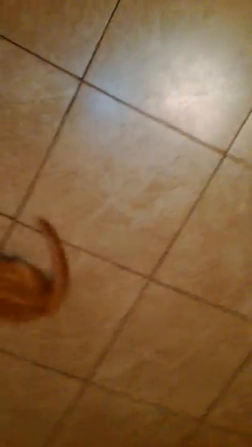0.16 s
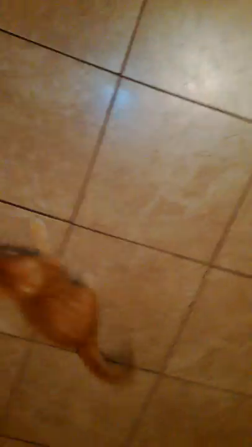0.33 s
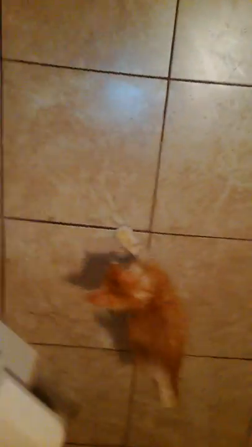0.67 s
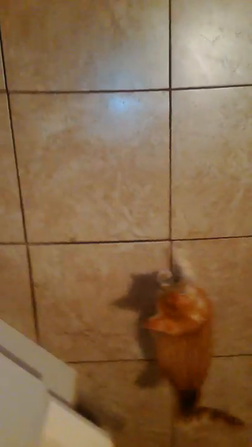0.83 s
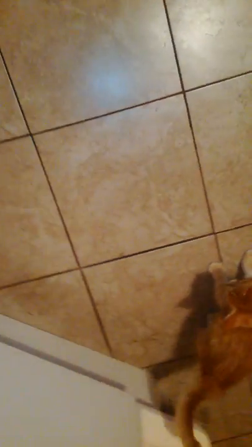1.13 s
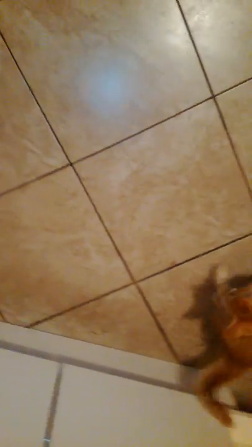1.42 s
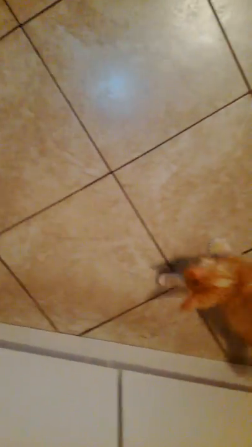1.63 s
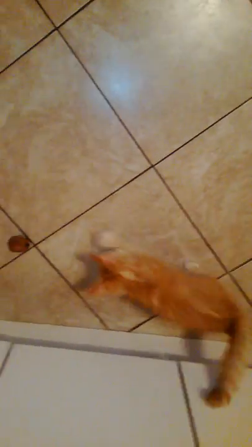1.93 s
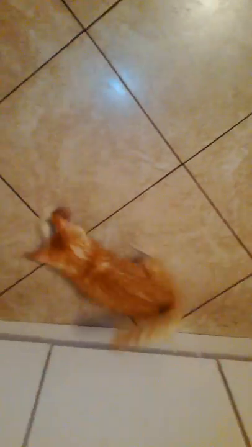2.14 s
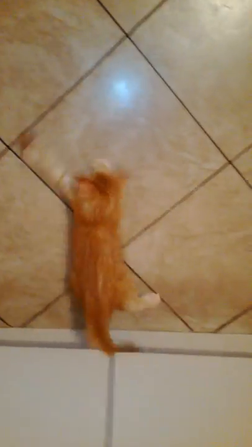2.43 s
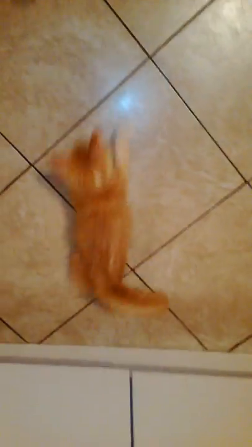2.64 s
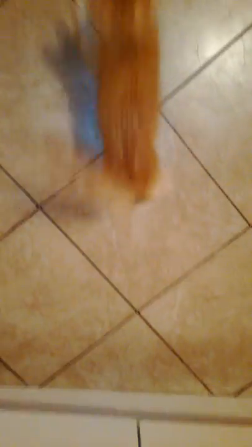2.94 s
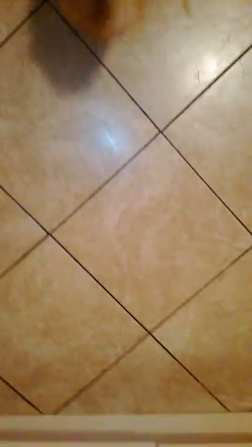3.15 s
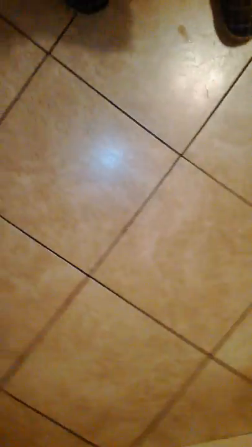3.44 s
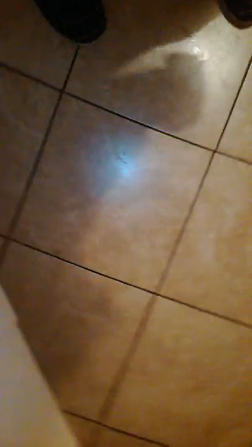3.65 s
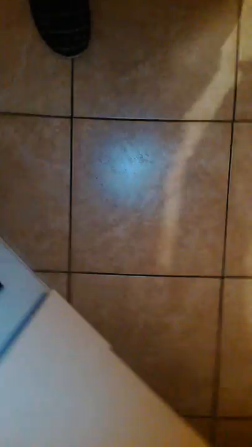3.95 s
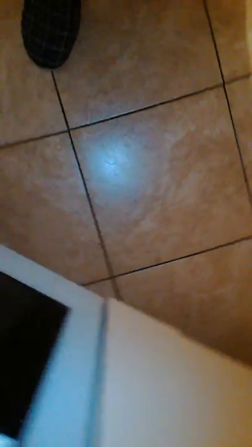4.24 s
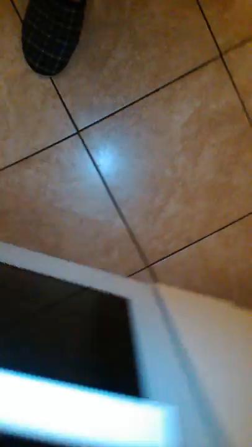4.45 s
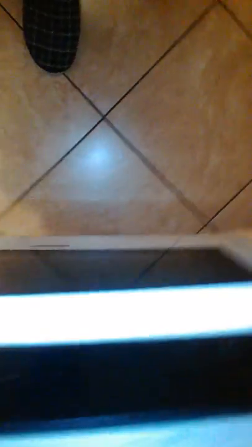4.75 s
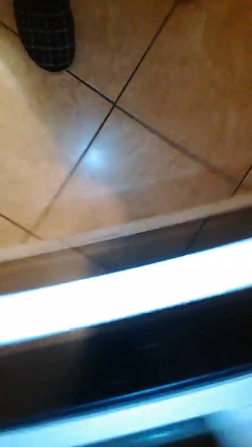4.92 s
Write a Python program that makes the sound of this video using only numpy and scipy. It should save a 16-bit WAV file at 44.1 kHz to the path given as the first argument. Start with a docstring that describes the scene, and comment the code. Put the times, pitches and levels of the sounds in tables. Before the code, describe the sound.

Batted by a kitten, a whole walnut clatters and skids over hard tiles in a small room, occasionally bumping wooden panels.

```python
"""Walnut on a tiled floor

A kitten bats a whole walnut across a small, bare room. Contacts excite the modes of the ridged shell,
which rattles as it rolls, clacks and skids on the tiles, and knocks on a skirting board and a cupboard.
Feet thud softly and brush the glaze. Hard walls reflect every contact, and the microphone is bright."""
import sys
import numpy as np
from scipy import signal
from scipy.fft import rfft, irfft
from scipy.io import wavfile

SR = 44100
rng = np.random.default_rng(int(sys.argv[2]) if len(sys.argv) > 2 else 0)


def to_wav(sig):
    """Store sig (one row per channel, or 1-D mono) as 16-bit WAV at the path in sys.argv[1].

    Samples outside -1..1 are clipped; the rate is SR.
    """
    pcm = np.clip(np.atleast_2d(sig), -1, 1) * 32767
    pcm = np.round(pcm).astype(np.int16)
    wavfile.write(sys.argv[1], SR, pcm.T)  # frames by channels


N = 224017
TIME = np.arange(N) / SR

# Levels in the tables are relative. The nut's range from the microphone: (time [s], distance [m])
NUT_PATH = [(0, 1.34), (0.92, 0.72), (1.4, 1.4), (2.3, 2.25), (2.6, 0.48), (2.8, 0.52), (3.25, 0.72),
            (3.55, 2.7), (3.95, 1.2), (4.15, 1), (5.0, 0.69)]
# Each bat or rebound rolls the nut on another side of its shell, until the next:
# (time [s], time it would take to stop [s], shell level [dB], treble level [dB], tile level [dB],
#  favoured pitch [Hz], fall-off from that pitch [dB/octave], narrow singing at that pitch [dB])
ROLLS = [(0.0, 1.2, -46.5, -49.5, -53, 1910, 15, -11), (0.14, 1.6, -42.5, -55, -55, 1730, 28, 2),
         (0.39, 0.43, -43.5, -54.5, -61.5, 1790, 29, 10), (0.68, 0.5, -50.5, -57, -61, 1420, 19, -9),
         (1.06, 0.3, -56, -62, -65, 1440, 16, -12), (1.361, 1.8, -72, -67, -73, 1500, 10, -16),
         (2.263, 0.9, -41.5, -52, -55, 1420, 24, 0), (2.465, 0.8, -39, -45.5, -54, 1670, 18, 7),
         (2.95, 9.3, -49, -57, -62.5, 1865, 46, -5), (3.289, 0.36, -44, -54.5, -61, 1880, 17, 1),
         (3.6, 2.1, -49, -58.5, -57, 1850, 12, -12), (3.705, 1.5, -40.5, -53.5, -50, 1650, 22, -6),
         (3.976, 1.5, -39.5, -51.5, -40.5, 1850, 39, 6), (4.2, 0.9, -44, -56, -42.5, 1890, 24, 2),
         (4.555, 0.53, -46, -59.5, -45.5, 1806, 4, -8)]
# Feet brushing the glaze: (time [s], duration [s], centre of the hiss [Hz], level [dB])
FOOT_SCUFFS = [(0.019, 0.045, 11800, -42), (2.35, 0.16, 11000, -53), (2.46, 0.071, 9300, -38.5),
               (2.855, 0.39, 11800, -52.5), (3.692, 0.068, 11300, -45), (3.8, 0.086, 11600, -62),
               (3.915, 0.039, 8130, -32), (4.028, 0.14, 11600, -50)]
# The nut sliding: (time [s], shell level [dB], rise time [s], decay time [s], treble level [dB])
NUT_SKIDS = [(0.03, -35.5, 0.039, 0.14, -40.5), (0.425, -48, 0.015, 0.05, -50),
             (0.682, -46, 0.0017, 0.026, -41), (0.8, -38, 0.0046, 0.046, -54.5),
             (0.914, -39.5, 0.0017, 0.052, -57), (2.214, -34.5, 0.024, 0.026, -38.5),
             (2.457, -49, 0.008, 0.18, -36), (2.542, -27, 0.0088, 0.0062, -25.5),
             (3.703, -31.5, 0.032, 0.016, -34), (3.823, -34, 0.0016, 0.053, -38),
             (4.556, -33, 0.0017, 0.006, -40), (4.718, -42, 0.01, 0.0057, -44),
             (4.795, -37.5, 0.0089, 0.035, -52), (4.949, -39, 0.002, 0.051, -51.5)]
# Impacts on the tiles: (time [s], shell level [dB], treble level [dB], favoured pitch [Hz], ping [Hz])
TILE_CLACKS = [(0.139, -11.5, -22.5, 1550, 6760), (0.237, -17, -27.5, 1610, 5830),
               (0.4243, -25.5, -42, 1784, 6200), (0.4952, -29, -62, 1780, 6400),
               (0.6832, -31, -33, 1580, 6300), (0.789, -30, -41, 1510, 6350),
               (0.801, -26, -33.5, 1270, 6400), (0.9144, -28, -42, 1800, 6150),
               (0.954, -41, -42, 1680, 6350), (0.983, -39, -44, 1500, 6400),
               (1.361, -47.5, -56, 1680, 6300), (1.377, -56, -54, 1850, 6600),
               (1.394, -45, -56, 1390, 6500), (1.412, -54, -58, 1950, 6600),
               (2.2165, -36, -47.5, 1910, 6560), (2.2316, -31.5, -41, 1680, 6400),
               (2.2653, -21, -30.5, 1430, 6100), (2.357, -26.5, -32, 1530, 6540),
               (2.465, -30, -27, 1590, 6140), (2.477, -34, -49, 1630, 6950), (2.514, -37, -33, 1670, 7500),
               (2.5505, -15.5, -30, 1630, 5700), (2.5664, -14.5, -24.5, 1595, 6400),
               (2.583, -26, -38, 1660, 6600), (2.605, -16, -18.5, 1660, 7000),
               (2.621, -40, -26, 1630, 4700), (2.665, -21, -20.5, 1600, 7200),
               (2.678, -27, -25, 1700, 7340), (2.7148, -17.5, -20, 1700, 6540),
               (2.771, -24, -29.5, 1470, 4400), (2.7949, -15.5, -20, 1690, 6820),
               (2.811, -19, -28.5, 1690, 3680), (2.821, -23, -29, 1630, 4060),
               (2.845, -25.5, -38, 1620, 3760), (2.873, -23.5, -41, 1560, 4320),
               (3.0757, -32, -47, 1880, 6100), (3.0946, -28, -37, 2140, 6200),
               (3.138, -37, -38, 1870, 7100), (3.1602, -25, -35.5, 1780, 3700),
               (3.1844, -29, -36, 2000, 3620), (3.2621, -25, -29.5, 1840, 3760),
               (3.2926, -31, -32, 1730, 5760), (3.3396, -25.5, -34.5, 2020, 5940),
               (3.6337, -30, -44, 1800, 6460), (3.702, -20.5, -45, 1400, 6540),
               (3.8243, -22.5, -25, 1880, 5940), (4.1065, -26, -38, 1720, 6600),
               (4.154, -16, -18.5, 1440, 6100), (4.304, -29, -50, 1800, 6500),
               (4.3749, -24.5, -39, 1770, 6100), (4.4289, -24, -46, 1830, 6500),
               (4.5544, -15, -23.5, 1605, 4980), (4.56, -42, -31.5, 2040, 6300),
               (4.593, -43, -46, 1490, 6200), (4.6795, -32.5, -53, 1900, 6500),
               (4.807, -32, -62, 2020, 6100), (4.8305, -28.5, -43, 1780, 6050),
               (4.951, -34, -44.5, 1930, 6600), (5.067, -33.5, -42.5, 1710, 6900)]
# Blows on large panels: (time [s], level [dB], pitch favoured by the struck spot [Hz])
SKIRTING_BLOWS = [(0.1375, -16.5, 422), (0.163, -23.5, 900)]
FOOTFALLS = [(0.15, -34, 100), (0.6, -54.5, 100), (1.035, -54, 222), (1.37, -54.5, 280), (2.0, -44.5, 100),
             (2.3, -41, 101), (2.555, -45, 300), (3.29, -44.5, 90), (3.66, -42, 99), (3.88, -39.5, 220),
             (4.0, -38, 139)]
CUPBOARD_BLOWS = [(4.1527, -15.5, 476), (4.325, -32.5, 556), (4.425, -37.5, 333), (4.555, -33.5, 218),
                  (4.593, -33, 610), (4.952, -43.5, 800)]
# Normal modes of each body: (frequency [Hz], bandwidth [Hz], level [dB])
SHELL_MODES = [(1090, 410, -5), (1490, 320, 0), (1714, 312, 1.5), (1960, 610, -1), (2223, 298, 3.5)]
SHELL_TREBLE_MODES = [(2970, 770, 4.5), (4030, 660, 11.5), (5020, 500, 6.5), (6180, 1600, 7),
                      (6620, 2300, 9), (9100, 14000, 1.5), (14200, 4200, -26)]
TILE_MODES = [(454, 450, -12.5), (817, 390, -10.5), (994, 330, -6.5), (1188, 110, -19)]
FLOOR_MODES = [(55.7, 43, 15.5), (101.6, 14, 21.5), (225, 150, 9), (352, 82, 4)]
SKIRTING_MODES = [(100, 50, -8), (161, 16, -3.5), (224, 57, -4.5), (363, 76, 1), (454, 90, -1),
                  (560, 46, -1), (645.5, 27, -3), (880, 860, -10), (1380, 220, -0.5), (1540, 130, -0.5),
                  (1700, 220, 1.5), (3200, 2000, -16.5)]
CUPBOARD_MODES = [(219.6, 1.85, 4.5), (271, 88, 1.5), (363, 76, 0), (476, 61, -0.5), (562, 49, 4.5),
                  (700, 87, 0), (787, 72, 1.5), (1000, 130, -0.5), (1150, 150, 4), (1280, 150, 6.5),
                  (1440, 190, 3.5), (2350, 4100, -4.5), (3900, 1300, 5)]
# Background noise of the room's still air: (frequency [Hz], spectrum level [dB])
AIR_SPECTRUM = [(25, 0), (60, -7), (110, -13), (250, -22), (600, -28), (1500, -35), (3000, -39),
                (6500, -37), (11000, -34), (16000, -34)]
# Reverberation of the room: (frequency [Hz], time to decay by 60 dB [s])
REVERB_TIMES = [(150, 0.43), (500, 0.4), (1600, 0.42), (4000, 0.52), (7000, 0.36), (14000, 0.39)]

TOP_HZ = 16200  # upper limit of the sound
SPIN_UP_S = 0.0012  # time a push takes to get the nut going
RIDGES_PER_S, SEAM_TAPS_PER_S, SEAM_DB = 520, 30, 10.5  # the raised seam lands seldom but hard
JOLT_DB, JOLT_FADE_S = 5, 0.013  # just after a push the nut rattles harder
PING_WIDTH_HZ, PING_DB = 690, 12  # the struck ridge's own resonance


def undb(db):
    """Amplitude ratio for a level in decibels."""
    return 10 ** (np.asarray(db) / 20)


def unit(x):
    """Normalisation to an rms of 1."""
    return x / np.sqrt(np.mean(x ** 2) + 1e-20)


def add(track, start_s, sound):
    """Superposition: a sound adds linearly to the track."""
    i = int(np.clip(start_s * SR, 0, N - 1))
    track[i:i + len(sound)] += sound[:N - i]


def resonate(x, hz, width):
    """A damped resonator, with unit gain at its centre frequency."""
    return signal.lfilter(*signal.iirpeak(min(hz, .45 * SR), max(hz / width, .9), SR), x)


def cut(x, hz, kind, order=2):
    """A maximally flat high-pass or low-pass filter."""
    return signal.sosfilt(signal.butter(order, min(hz, .45 * SR), kind, fs=SR, output="sos"), x)


def contacts(rate, scatter_db, size):
    """Shot noise: independent impulses at `rate` per second, a few harder than the rest."""
    hit = rng.random(size) < rate / SR
    return hit * undb(scatter_db * np.minimum(rng.exponential(size=size), 3))


def at_spot(modes, favoured_hz, db_per_octave):
    """Modal coupling: a contact point excites most the modes near its favoured pitch."""
    return [(hz, width, db - db_per_octave * abs(np.log2(hz / favoured_hz))) for hz, width, db in modes]


def rattle(force, modes):
    """Random excitation: each contact lands on another spot and weights the modes afresh."""
    return sum(undb(db) * resonate(force * rng.standard_normal(len(force)), hz, width)
               for hz, width, db in modes)


def shell_on_tile(force, time_s):
    """Forced vibration of the shell's main modes, its treble and the tile, for the side then rolling."""
    latest_roll = max(sum(roll[0] <= time_s + SPIN_UP_S for roll in ROLLS) - 1, 0)
    *_, favoured_hz, db_per_octave, singing_db = ROLLS[latest_roll]
    shell = rattle(force, at_spot(SHELL_MODES, favoured_hz, db_per_octave))
    shell = cut(cut(shell, 858, "high"), 3000, "low")
    shell += undb(singing_db) * resonate(shell, favoured_hz, width=230)
    treble = cut(rattle(force, SHELL_TREBLE_MODES), 3830, "high")
    tile = cut(rattle(force, TILE_MODES), 425, "high", order=3)
    return unit(shell), unit(treble), unit(tile)


def air(level_db=-64.5):
    """Stationary noise: a faint rumble and hiss of fixed spectrum."""
    hz, db = np.transpose(AIR_SPECTRUM)
    bins = np.maximum(np.fft.rfftfreq(N, 1 / SR), 1)
    gain = undb(np.interp(np.log(bins), np.log(hz), db))
    return undb(level_db) * unit(irfft(rfft(rng.standard_normal(N)) * gain, N))


def rolling(rumble_db=-22):
    """Rolling friction slows the nut uniformly, so the taps of its ridges weaken and thin out."""
    out = np.zeros(N)
    ends = [roll[0] for roll in ROLLS[1:]] + [N / SR]
    for (start, stop_s, shell_db, treble_db, tile_db, *_), end in zip(ROLLS, ends):
        t = TIME[:int((end - start + SPIN_UP_S) * SR)]
        speed = np.maximum(1 - t / stop_s, 0)  # fraction of the initial speed
        ridges = contacts(RIDGES_PER_S * np.maximum(speed, 0.12), scatter_db=3.5, size=len(t))
        seam = undb(SEAM_DB) * (rng.random(len(t)) < SEAM_TAPS_PER_S / SR)
        shell, treble, tile = shell_on_tile(ridges + seam, start)
        rumble = undb(rumble_db) * unit(rattle(ridges, FLOOR_MODES))
        ring = undb(shell_db) * (shell + rumble) + undb(treble_db) * treble + undb(tile_db) * tile
        jolt = 1 + undb(JOLT_DB) * np.exp(-t / JOLT_FADE_S)
        crossfade = np.clip(np.minimum(t, t[-1] - t) / SPIN_UP_S, 0, 1)
        add(out, start, crossfade * jolt * speed ** 0.31 * ring)
    return out


def scuffs(width_hz=3800):
    """Friction noise: a foot sliding on the glaze gives a grainy hiss that rises fast and tails off."""
    out = np.zeros(N)
    for start, duration, hz, db in FOOT_SCUFFS:
        t = TIME[:int(duration * SR)]
        grains = contacts(rate=2800, scatter_db=3, size=SR) * rng.standard_normal(SR)
        hiss = unit(resonate(resonate(grains[:len(t)], hz, width_hz), hz, width_hz))
        envelope = np.interp(t / duration, [0, 0.25, 1], [0, 1, 0])
        add(out, start, undb(db) * hiss * envelope)
    return out


def skids(tile_db=-12):
    """Sliding friction drives shell and tile with a dense burst of tiny contacts."""
    out, t = np.zeros(N), TIME[:SR // 2]
    for start, shell_db, rise, decay, treble_db in NUT_SKIDS:
        shell, treble, tile = shell_on_tile(contacts(rate=2300, scatter_db=0.5, size=len(t)), start)
        chatter = undb(shell_db) * (shell + undb(tile_db) * tile)
        hiss = undb(treble_db) * cut(treble, 5630, "high")  # sliding contacts are the briefest
        envelope = np.minimum(t / rise, 1) * np.exp(-np.maximum(t - rise, 0) / decay)
        add(out, start, envelope * (chatter + hiss))
    return out


def strike(modes, force, scatter_db=1.6, detune=0.011):
    """Free vibration after one blow; mode levels and pitches vary with the spot struck."""
    ring = np.zeros(len(force))
    for k, (hz, width, db) in enumerate(modes):
        level_draw, pitch_draw = rng.standard_normal(2)
        mode = resonate(force, hz * (1 + detune * pitch_draw), width)
        ring += (-1) ** k * undb(db + scatter_db * level_draw) * mode
    return ring * np.sqrt(.005 * SR / np.sum(ring ** 2))  # the energy of 5 ms at an rms of 1


def panel(blows, modes, contact_s, low_hz, high_hz, db_per_octave):
    """Smooth force pulses excite a large panel, which radiates little outside its band of modes."""
    out, t = np.zeros(N), TIME[:12000]
    pulse = t / contact_s * np.exp(-t / contact_s)
    for start, db, favoured_hz in blows:
        add(out, start, undb(db) * strike(at_spot(modes, favoured_hz, db_per_octave), pulse))
    return cut(cut(out, low_hz, "high"), high_hz, "low")


def skirting_knocks():
    """A brief impact has a broad spectrum: the nut rings the board's low and high modes together."""
    return panel(SKIRTING_BLOWS, SKIRTING_MODES,
                 contact_s=0.00004, low_hz=70.4, high_hz=2850, db_per_octave=1.5)


def snap(spread_s):
    """Dispersion of bending waves: the treble of a hard contact arrives before the bass."""
    sweep = np.exp(-TIME[:6000] / spread_s)  # frequency as a fraction of TOP_HZ
    return np.sqrt(sweep) * np.cos(2 * np.pi * TOP_HZ * spread_s * (1 - sweep))


def clacks():
    """Double impact: the nut lands on a ridge, which pings, then rocks more softly onto the next."""
    out = np.zeros(N)
    for start, shell_db, treble_db, favoured_hz, ping_hz in TILE_CLACKS:
        main_modes = at_spot(SHELL_MODES, favoured_hz, db_per_octave=19.5)
        upper_modes = list(SHELL_TREBLE_MODES) + [(ping_hz, PING_WIDTH_HZ, PING_DB)]
        for lag_s, db in ((0, 0), (rng.uniform(0.00151, .003), -8)):
            shell = cut(strike(main_modes, snap(spread_s=0.0003966)), 900, "high")
            treble = cut(strike(upper_modes, snap(spread_s=0.001001)), 2200, "high")
            clack = undb(shell_db - 6) * shell + undb(treble_db - 8) * treble
            add(out, start + lag_s, undb(db) * clack)
    return out


def footfalls():
    """A soft, longer contact carries little treble: each foot draws a dull thud from the floor."""
    return panel(FOOTFALLS, FLOOR_MODES, contact_s=0.00029, low_hz=34.9, high_hz=500, db_per_octave=7.5)


def cupboard_knocks():
    """Panel resonance: the nut strikes the cupboard, whose lightly damped lowest mode rings longest."""
    return panel(CUPBOARD_BLOWS, CUPBOARD_MODES,
                 contact_s=0.00004, low_hz=234, high_hz=5000, db_per_octave=8.5)


def wall_response(gap_s=0.0012, early_db=1, early_fade_s=0.0056, size=24000):
    """Reverberation: discrete reflections thicken into a tail, each band decaying at its own rate."""
    t = TIME[:size]
    density = np.clip(.1 + t / .05, 0, 1)
    echoes = rng.standard_normal(size) * (rng.random(size) < density) / np.sqrt(density)
    echoes *= (t > gap_s) * (1 + undb(early_db) * np.exp(-t / early_fade_s))
    hz, t60 = np.transpose(REVERB_TIMES)
    log_bins = np.log(np.maximum(np.fft.rfftfreq(size, 1 / SR), 1))
    bands = [np.interp(log_bins, np.log(hz), weights) for weights in np.eye(len(hz))]
    spectrum = rfft(echoes)
    tail = sum(irfft(spectrum * band, size) * undb(-60 * t / decay) for band, decay in zip(bands, t60))
    return tail / np.sqrt(np.sum(tail ** 2))


def room(x, size=3584):
    """A moving source has a time-varying response: each stretch of its path has its own reflections."""
    out = np.zeros(N)
    for start in range(-size // 2, N, size // 2):
        i = np.arange(max(start, 0), min(start + size, N))
        window = np.sin(np.pi * (i - start) / size)
        add(out, i[0] / SR, signal.fftconvolve(x[i] * window, wall_response()))
    return out


def scene():
    """The nut's direct-to-reverberant ratio falls inversely with distance; footfalls only reverberate."""
    on_tiles = rolling() + clacks() + skids() + scuffs()
    wood = skirting_knocks() + cupboard_knocks()
    thuds = footfalls()
    distance_m = np.interp(TIME, *np.transpose(NUT_PATH))
    direct_ratio = 0.45 / distance_m
    on_tiles /= np.sqrt(1 + direct_ratio ** 2)  # total power is independent of distance
    direct = direct_ratio * on_tiles + undb(1) * wood
    reverberant = room(on_tiles + undb(3) * wood + thuds)
    return (direct + reverberant + air())[None]


def record(dry):
    """Resonance of the microphone's port lifts the treble; a steep low-pass removes the very top."""
    bright = dry + undb(12) * resonate(dry, hz=6320, width=2060)
    return signal.sosfilt(signal.ellip(10, .2, 70, TOP_HZ, fs=SR, output="sos"), bright)


dry = scene()
out = record(dry)
to_wav(out)
```